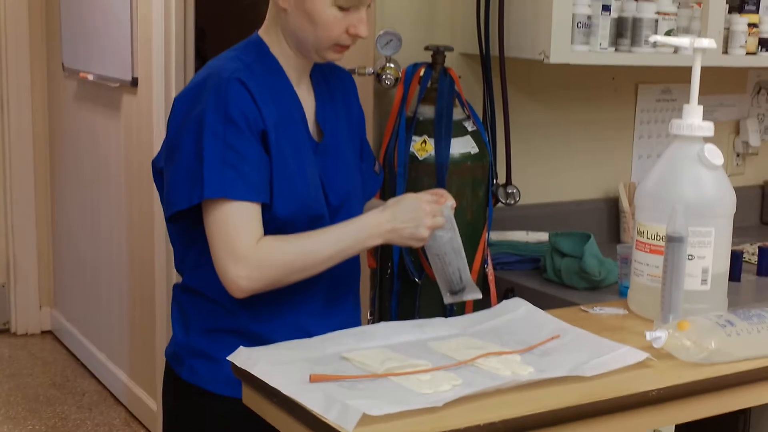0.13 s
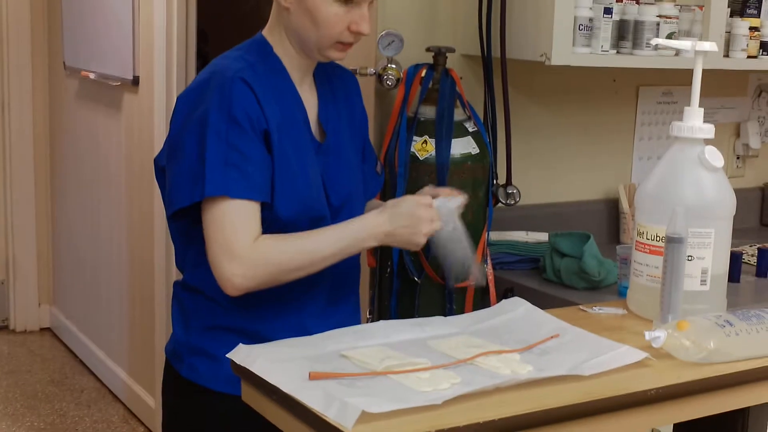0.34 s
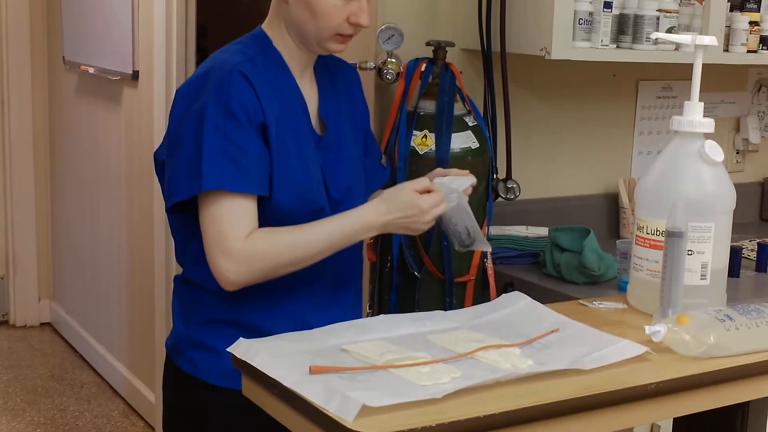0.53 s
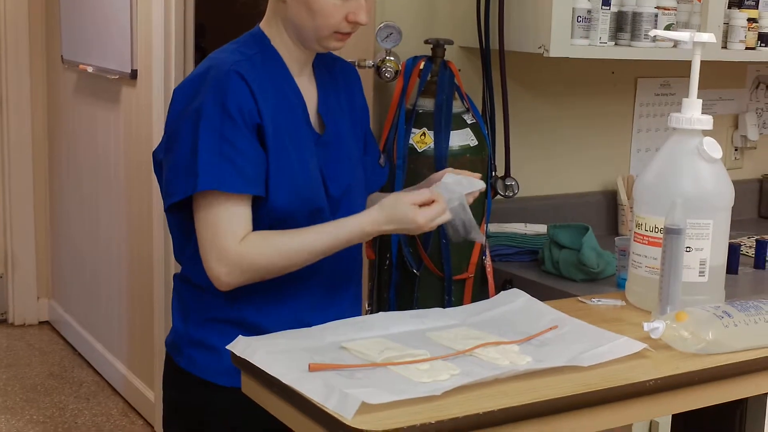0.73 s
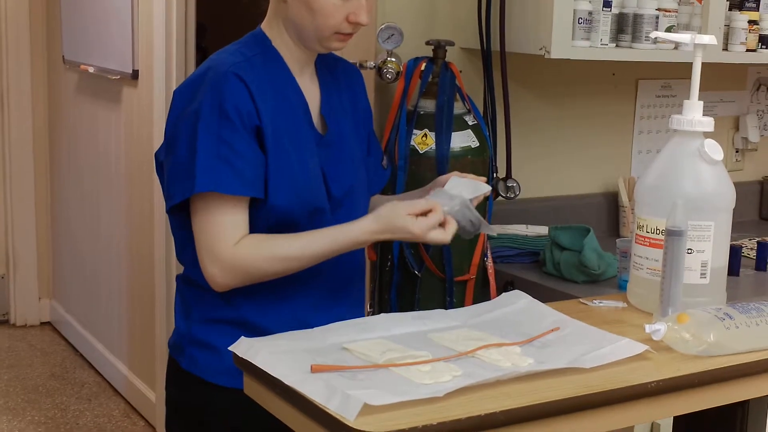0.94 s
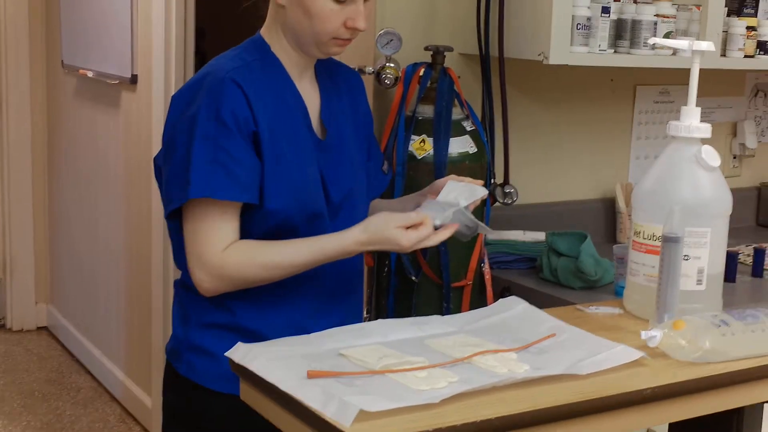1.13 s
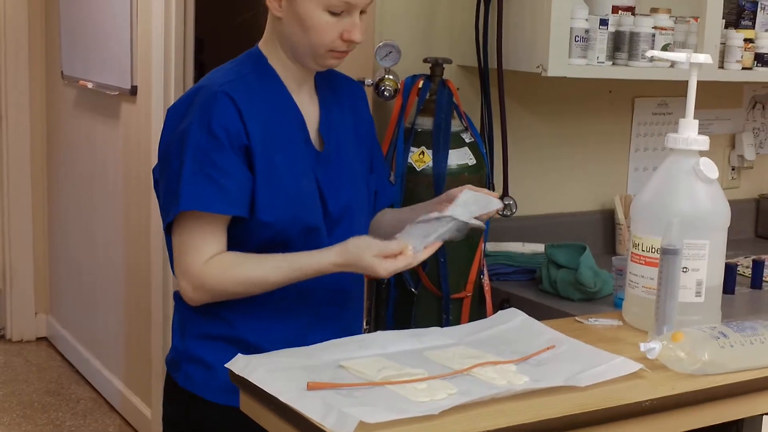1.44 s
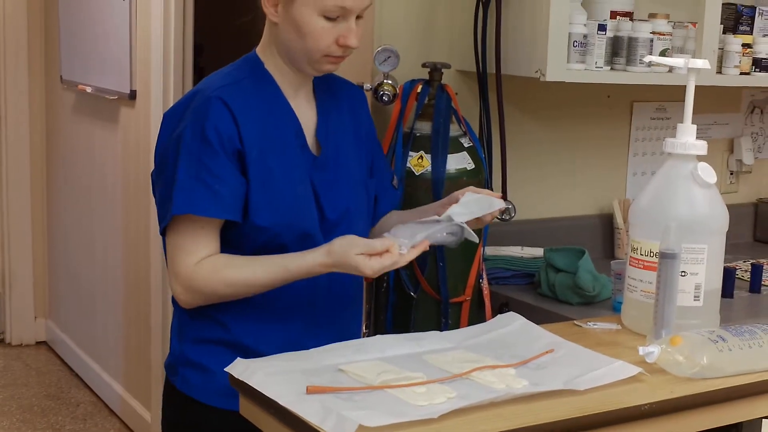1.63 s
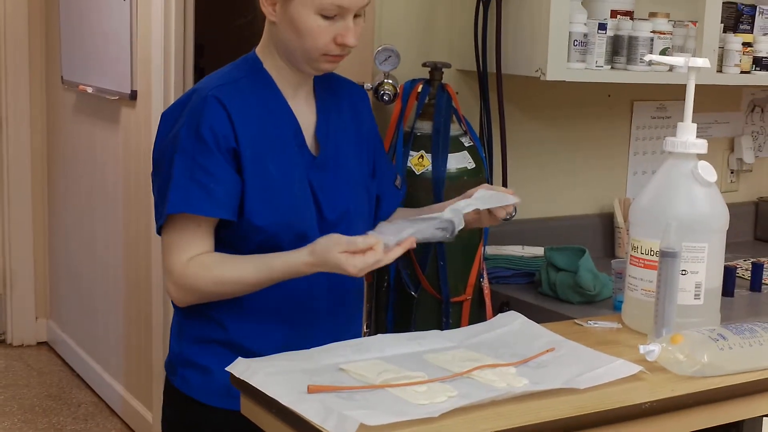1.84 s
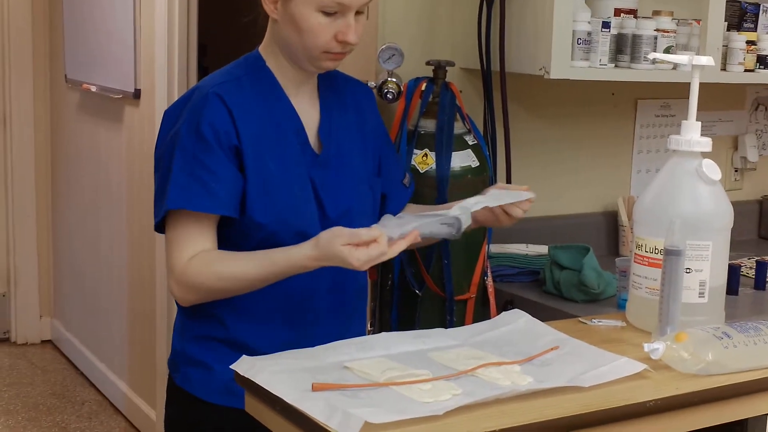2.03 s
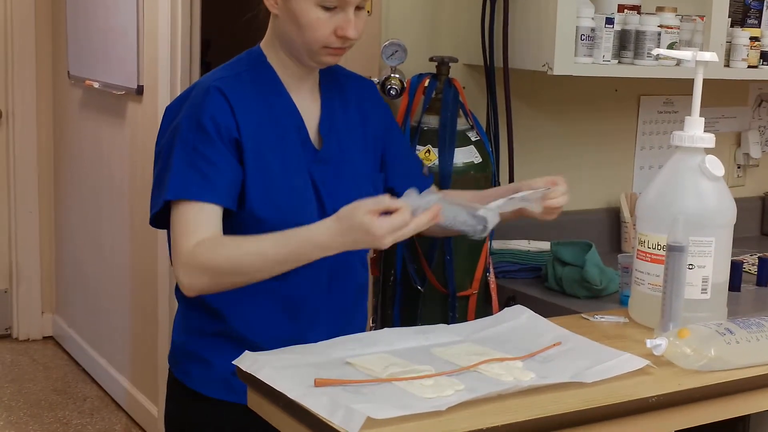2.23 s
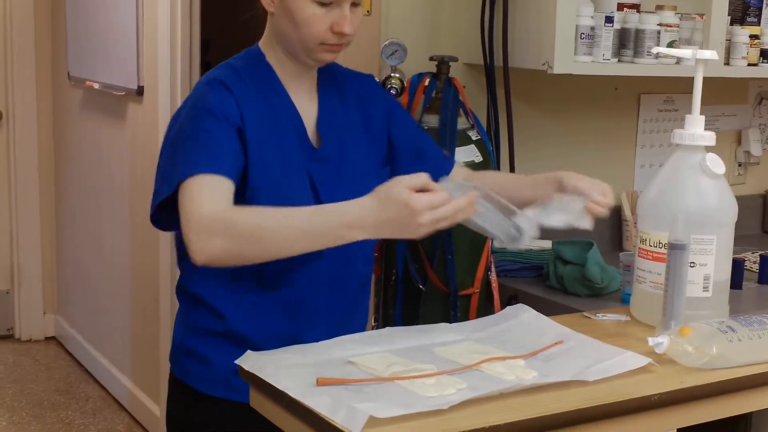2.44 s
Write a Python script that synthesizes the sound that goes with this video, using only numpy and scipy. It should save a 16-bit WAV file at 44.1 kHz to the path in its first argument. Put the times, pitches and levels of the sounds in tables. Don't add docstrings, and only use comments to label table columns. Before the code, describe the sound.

A plastic and paper packet is peeled open by hand, with sharp crackles and snaps near the start, then lighter rustles, in a small hard-walled room with faint ventilation, heard from a few metres through a boxy microphone.

```python
import sys
import numpy as np
from scipy import signal
from scipy.fft import rfft, irfft
from scipy.io import wavfile

SR = 44100
rng = np.random.default_rng(int(sys.argv[2]) if len(sys.argv) > 2 else 0)


def to_linear_factor(level_db):
    exponent = np.asarray(level_db, float) / 20
    return 10 ** exponent


def master(y):
    cut = np.clip(np.atleast_2d(y).T, -1, 1)
    pcm = np.round(cut * 32767)
    wavfile.write(sys.argv[1], SR, pcm.astype(np.int16))


N = 114660
T = np.arange(N) / SR


def rms_one(x):
    return x / np.sqrt(np.mean(x ** 2) + 1e-20)


def ring(clicks, hz, t60):
    r = to_linear_factor(-60 / (t60 * SR))
    w = 2 * np.pi * hz / SR
    return signal.lfilter([0, np.sin(w)], [1, -2 * r * np.cos(w), r * r], clicks + 1e-18)


def drift(rate):
    r = np.exp(-2 * np.pi * rate / SR)
    wander = signal.lfilter([1], [1, -2 * r, r * r], rng.standard_normal(N + SR))
    return rms_one(wander[SR:])


def response(points, size):
    hz, db = np.transpose(points)
    grid = np.maximum(np.arange(size // 2 + 1) * SR / size, 1)
    log_gain = np.interp(np.log(grid), np.log(hz), db) * np.log(10) / 20
    cepstrum = irfft(log_gain, size)
    cepstrum[1:size // 2] *= 2
    cepstrum[size // 2 + 1:] = 0
    return grid, np.exp(rfft(cepstrum))


def creases(clicks, crisp):
    cycles, crisp_hz, crisp_db = 4.3, 5200, -5.5
    pitches = np.geomspace(500, 5000, 16)
    dealt = rng.integers(0, 16, N)
    body = 0
    for k, hz in enumerate(pitches):
        brightness = crisp ** np.clip(hz / 2500 - 1, 0, 1)
        struck = clicks * (dealt == k) * brightness
        body = body + ring(struck, hz, cycles / hz) * np.sqrt(hz / 2500)
    treble = signal.butter(2, crisp_hz, "high", fs=SR, output="sos")
    edge = signal.sosfilt(treble, clicks * crisp)
    return 0.5 * body + to_linear_factor(crisp_db) * edge


def crinkle():
    # (peak time [s], rise [s], hold [s], peak level [dB], brightness [dB])
    tugs = [(0.097, 0.0024, 0.017, -28, -34), (0.194, 0.0083, 0.0082, -15, 0),
            (0.225, 0.0083, 0.026, -14, 3), (0.308, 0.018, 0.086, -28.5, -5),
            (0.436, 0.0024, 0.0069, -20, -10.5), (0.506, 0.019, 0.047, -32, 4.5),
            (0.565, 0.023, 0.013, -28, 7.5), (0.605, 0.03, 0.068, -27, -2.5), (0.787, 0.022, 0.019, -32, 3),
            (0.864, .002, 0.0083, -22.5, 9), (0.977, 0.026, 0.093, -36.5, 4), (1.081, .01, 0.026, -25.5, 2),
            (1.108, 0.044, .04, -25, 3), (1.267, .012, 0.0048, -26.5, -21),
            (1.324, 0.15, 0.024, -19.5, 8.5), (1.43, 0.065, 0.047, -32, 4), (1.57, 0.093, 0.021, -24, 8.5),
            (1.617, 0.084, 0.038, -21.5, 5), (1.825, 0.13, 0.02, -34.5, 8.5),
            (1.952, .006, 0.0087, -36, -1), (2.016, .01, .03, -41, -2), (2.267, .003, 0.0039, -26.5, -11),
            (2.291, 0.0018, 0.012, -29.5, 7.5), (2.43, 0.035, 0.042, -45.5, 8.5)]
    rise_db, release_db_per_s = 28.5, 287
    creases_per_s, spread_db = 3200, 3.8
    clump_db, clumps_per_s = 2, 80
    level, crisp = np.zeros(N), np.zeros(N)
    for s, rise, hold, db, bright_db in tugs:
        before_peak = np.maximum(s - T, 0) / max(rise, 0.001)
        after_hold = np.maximum(T - s - hold, 0)
        shape = to_linear_factor(db - rise_db * before_peak - release_db_per_s * after_hold)
        level += shape
        crisp += shape * to_linear_factor(bright_db)
    sizes = to_linear_factor(spread_db * np.minimum(rng.exponential(1, N), 3.5))
    sizes = sizes * rng.choice([-1, 1], N)
    born = rng.random(N) < creases_per_s / SR
    clumps = to_linear_factor(clump_db * drift(clumps_per_s))
    clicks = rms_one(sizes * born * clumps)
    return creases(clicks * level, crisp / (level + 1e-12))


def snaps():
    # (time [s], level [dB], pitch [Hz], crisp edge [dB])
    snap_list = [(.104, -26, 2000, -35), (.226, -7, 2600, -24), (.2335, -12, 2700, -24),
                 (.239, -12, 2600, -24), (.246, -1, 1480, -34), (.250, -6, 2640, -24),
                 (.256, -8, 2700, -24), (.268, -10, 2640, -26), (.274, -9, 2640, -26),
                 (.4405, -17, 1750, -32), (.8653, -14, 1500, -18), (.8657, -11, 3900, -20),
                 (.868, -16, 2900, -16), (1.258, -17, 1550, -35), (1.279, -17, 2650, -22),
                 (1.327, -14, 2500, -18), (1.353, -14, 2500, -18), (1.581, -17, 2700, -20),
                 (1.619, -14, 2400, -20), (1.628, -14, 2500, -20), (2.278, -25, 2600, -22),
                 (1.957, -25, 1800, -35), (2.2965, -19, 1300, -24), (2.297, -20, 2600, -15),
                 (2.303, -18, 2700, -18), (2.308, -18, 2750, -14), (2.321, -19, 2750, -22),
                 (2.327, -20, 2800, -22), (2.5775, -20, 2650, -28), (2.587, -24, 2600, -28)]
    snap_db, ring_cycles, swell_s = 9.5, 17, 0.00088
    edge_gain_db, edge_t60_s = 14, 0.03
    size = 2000
    out, t = np.zeros(N + size), T[:size]
    treble = signal.butter(2, 7500, "high", fs=SR, output="sos")
    noise = signal.sosfilt(treble, rng.standard_normal((len(snap_list), size)))
    for (s, db, hz, edge_db), hiss in zip(snap_list, noise):
        swell = 1 - np.exp(-t / swell_s)
        tone = np.sin(2 * np.pi * hz * t) * to_linear_factor(-60 * t * hz / ring_cycles) * swell
        edge = to_linear_factor(edge_db + edge_gain_db) * hiss * to_linear_factor(-60 * t / edge_t60_s)
        start = int(s * SR)
        out[start:start + size] += to_linear_factor(db + snap_db) * (tone + edge)
    return out[:N]


def pats():
    # (time [s], level [dB], pitch [Hz], ring length [cycles], thud [dB])
    pat_list = [
        (.012, -44, 170, 5, 6),
        (.198, -31, 560, 72, -28),
        (.228, -30, 373, 11.3, -4),
        (.44, -21.5, 563, 6.8, -15),
        (.666, -26, 418, 7.8, -7.5),
        (.805, -42.5, 715, 75, -17),
        (.84, -37, 700, 33, -30),
        (.893, -29.5, 222, 2.5, -9),
        (1.60, -36.5, 720, 77, -20),
    ]
    thud_hz, thud_t60_s = 126, 0.014
    out = np.zeros(N)
    for s, db, hz, cycles, thud_db in pat_list:
        touch = np.zeros(N)
        touch[int(s * SR)] = to_linear_factor(db + 27.5)
        pocket = ring(touch, hz, cycles / hz)
        thud = ring(touch, thud_hz, thud_t60_s)
        out += pocket + to_linear_factor(thud_db + 7.5) * thud
    return signal.lfilter([0.01], [1, -1.8, 0.81], out)


def room(x):
    low_t60_s, high_t60_s, split_hz = 0.34, 0.2, 5000
    moves_per_s, build_up_s = 30, 0.0039
    low_pass = signal.butter(1, split_hz, fs=SR, output="sos")
    high_pass = signal.butter(2, split_hz, "high", fs=SR, output="sos")
    t, out = T[:SR], 0
    for k in range(4):
        low = signal.sosfilt(low_pass, rng.standard_normal(SR)) * to_linear_factor(-60 * t / low_t60_s)
        high = signal.sosfilt(high_pass, rng.standard_normal(SR)) * to_linear_factor(-60 * t / high_t60_s)
        tail = (low + high) * np.clip(t / build_up_s, 0, 1)
        tail = tail / np.sqrt(np.sum(tail ** 2))
        share = np.cos(np.pi / 4 * (moves_per_s * T - k)) ** 2 * 0.8
        out = out + signal.fftconvolve(x * share, tail)[:N]
    return out


def air():
    # (frequency [Hz], level [dB per Hz])
    air_colour = [(30, 6), (120, -5), (300, -8), (700, -21), (1200, -18), (2500, -32.5), (4500, -35),
                  (12000, -29.5)]
    # (frequency [Hz], width [Hz], level [dB])
    ducts = [(379, 18, -53.5), (517, 38, -58.5), (753.7, 75, -54)]
    air_db = -44.5
    colour = response(air_colour, N)[1]
    broad = rms_one(irfft(rfft(rng.standard_normal(N)) * colour, N))
    out = to_linear_factor(air_db + 20.5 + drift(10.6)) * broad
    for hz, width, db in ducts:
        hum = rms_one(ring(rng.standard_normal(N), hz, 3.3 / width))
        out = out + to_linear_factor(db + 17.5 + 3.4 * drift(4.3)) * hum
    return out


def lamp_whine():
    # (frequency [Hz], level [dB])
    whine_tones = [(13420, -69.3)]
    wander_hz = 3
    out = 0
    for hz, db in whine_tones:
        phase = 2 * np.pi * np.cumsum(hz + wander_hz * drift(6)) / SR
        out = out + to_linear_factor(db) * np.sqrt(2) * np.sin(phase)
    return out


def scene():
    room_db, pat_room_db = 0.5, -6.5
    film = crinkle() + snaps()
    touch = pats()
    echoes = to_linear_factor(room_db) * room(film + to_linear_factor(pat_room_db) * touch)
    return (film + touch + echoes + air())[None]


def top_cut(x):
    return signal.sosfilt(signal.butter(12, 16460, fs=SR, output="sos"), x)


def record(dry):
    # (frequency [Hz], level [dB])
    mic_colour = [(30, -46), (600, -17.5), (1200, -16.5), (2550, 4), (3500, -9.5), (5200, -20.5),
                  (7000, -29.5), (11000, -35.5)]
    # (frequency [Hz], width [Hz])
    dead_spots = [(6000, 2380), (8030, 3340)]
    # (frequency [Hz], width [Hz], level [dB])
    bumps = [(1513, 50, 1), (2125, 148, 2), (3100, 204, 4), (4090, 490, 4.5), (10110, 1280, 8),
             (14100, 1800, 4.5)]
    cutoff_hz = 15750
    hz, gain = response(mic_colour, 2 * N)
    for spot_hz, width in dead_spots:
        away = spot_hz ** 2 - hz ** 2
        gain = gain * (away + 20j * hz) / (away + 1j * width * hz)
    for bump_hz, width, db in bumps:
        gain = gain * to_linear_factor(db * np.exp(-((hz - bump_hz) / width) ** 2))
    mirrored = np.hstack([dry, dry[:, ::-1]])
    heard = irfft(rfft(mirrored) * gain * (hz < cutoff_hz))[:, :N]
    x = heard + lamp_whine()
    return top_cut(0.82 * np.tanh(x / 0.83))


dry = scene()
out = record(dry)
master(out)
```